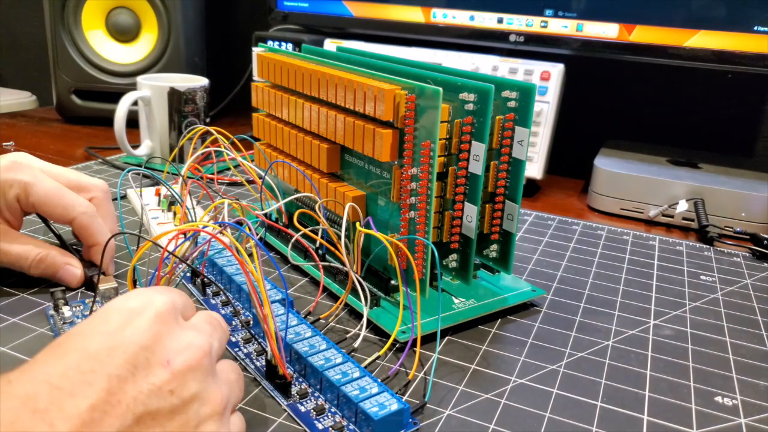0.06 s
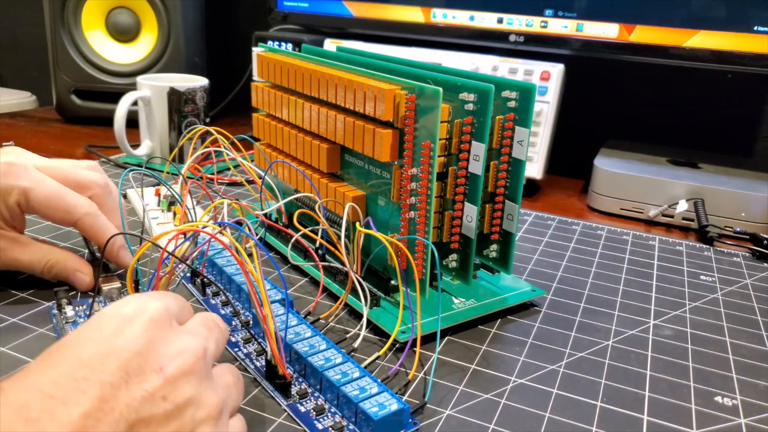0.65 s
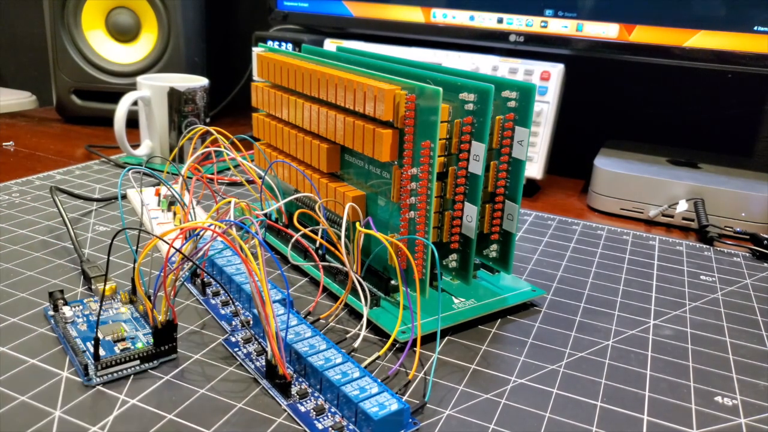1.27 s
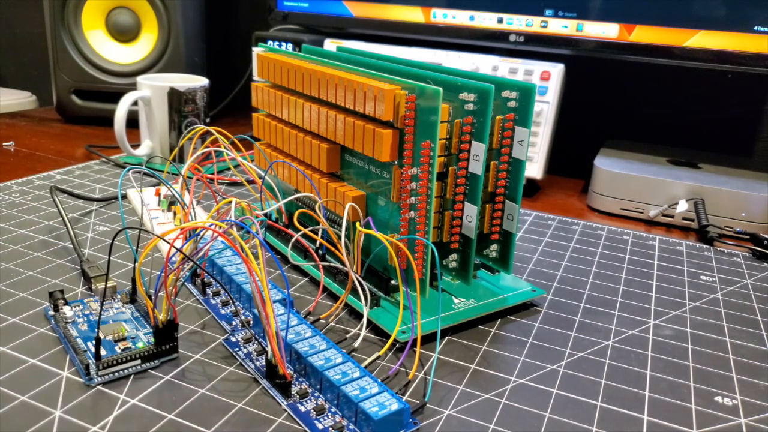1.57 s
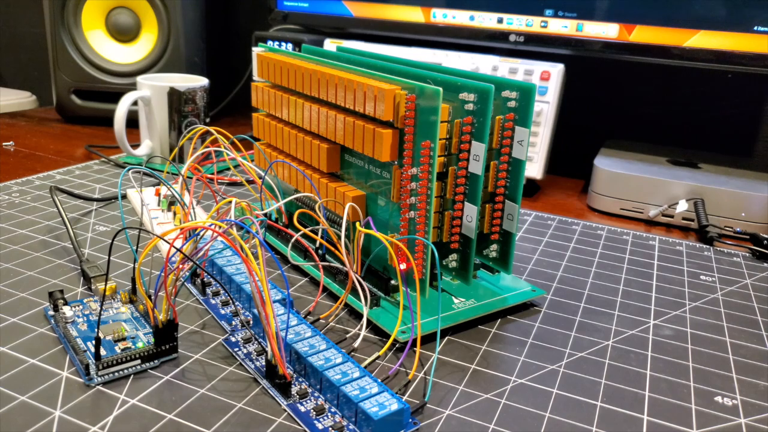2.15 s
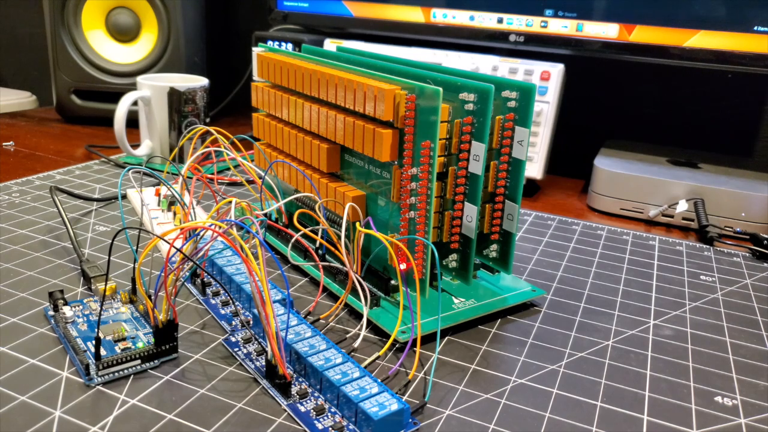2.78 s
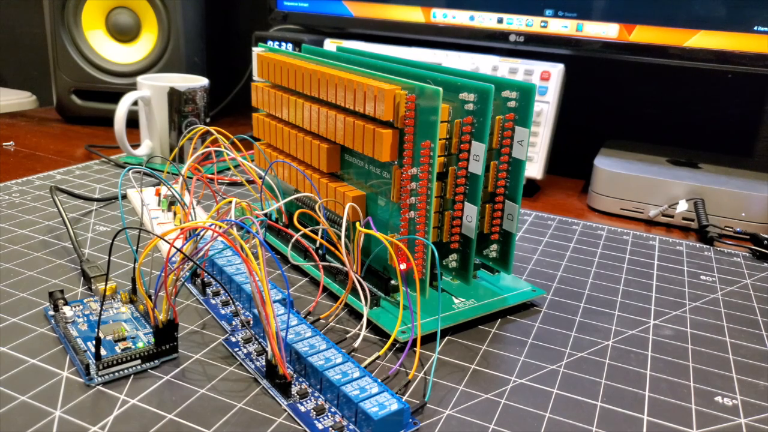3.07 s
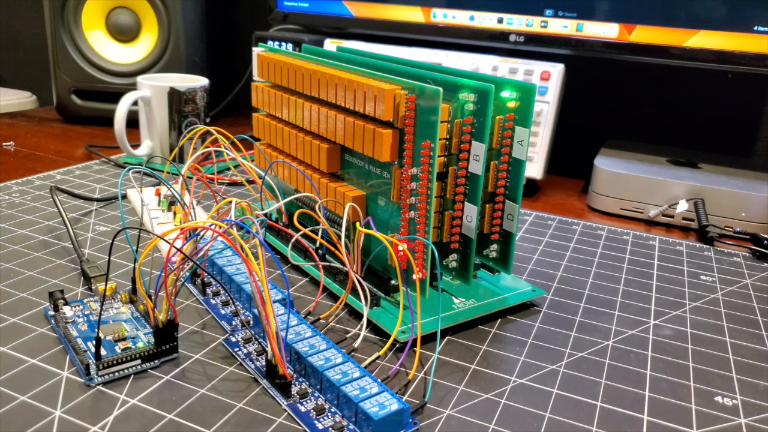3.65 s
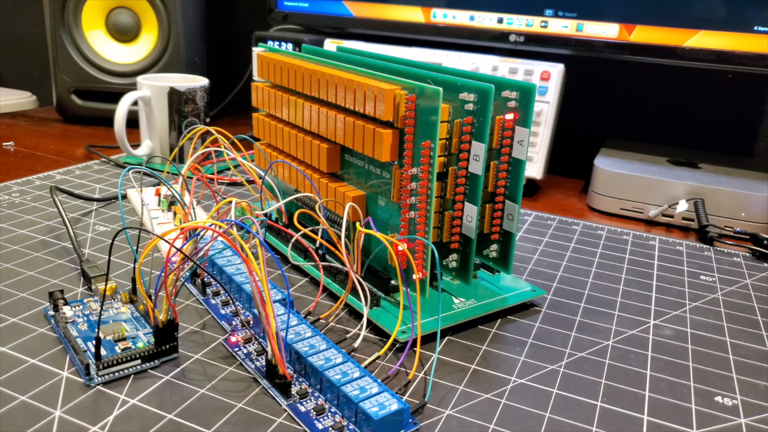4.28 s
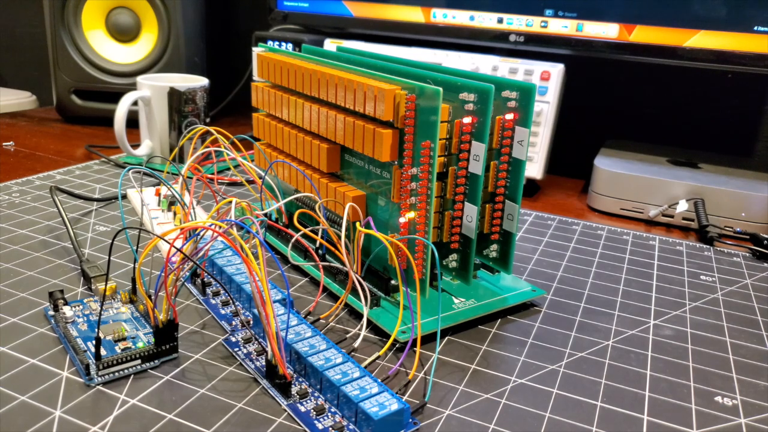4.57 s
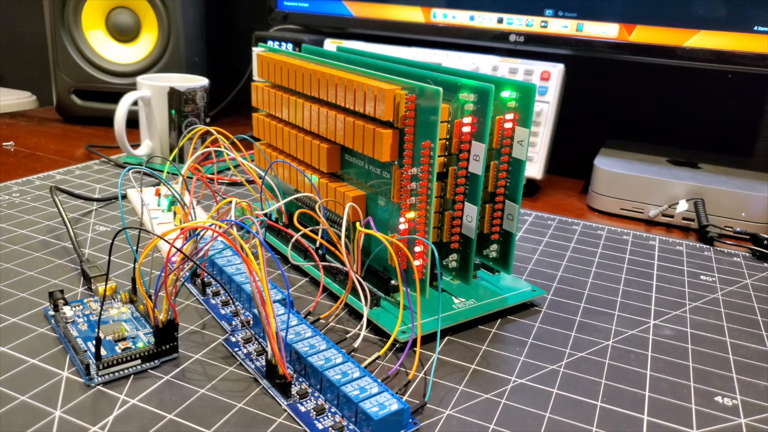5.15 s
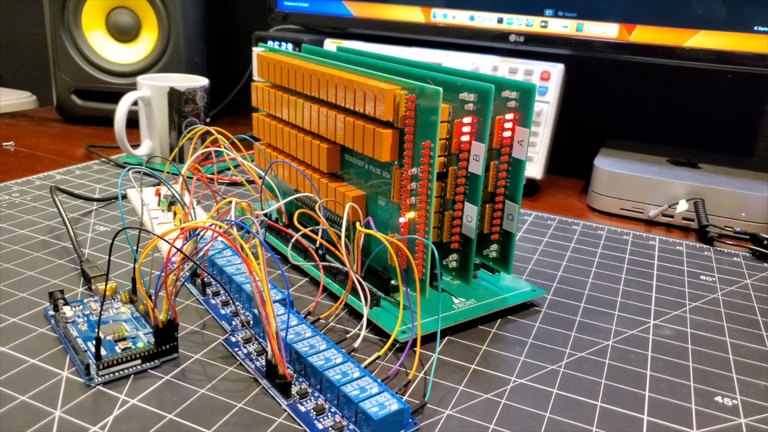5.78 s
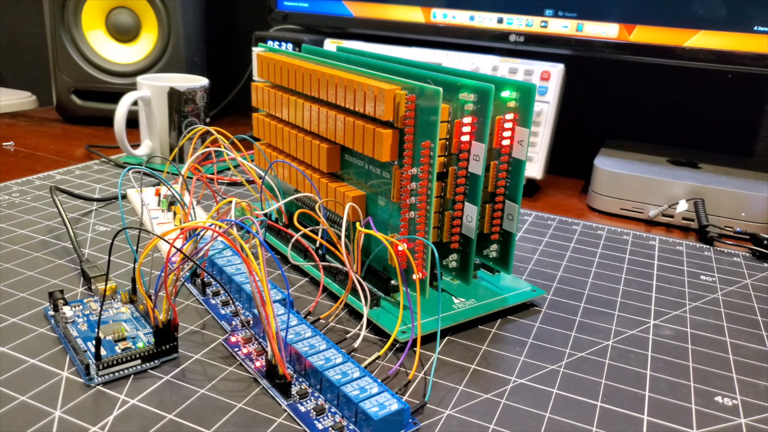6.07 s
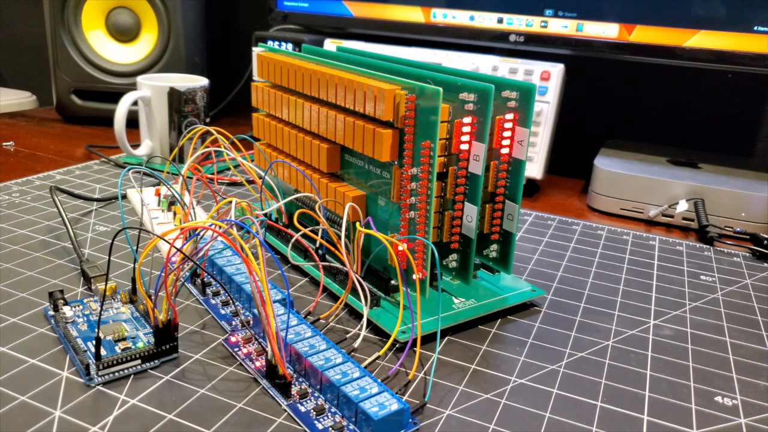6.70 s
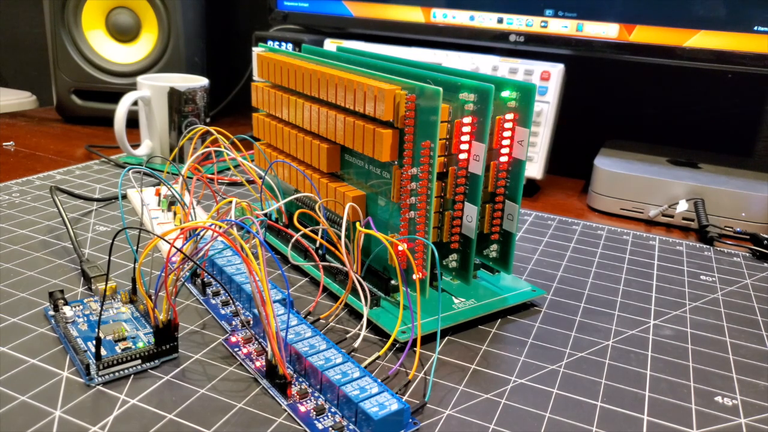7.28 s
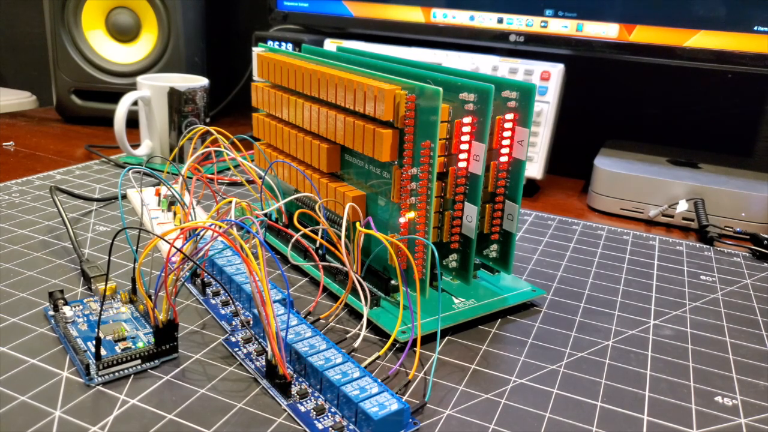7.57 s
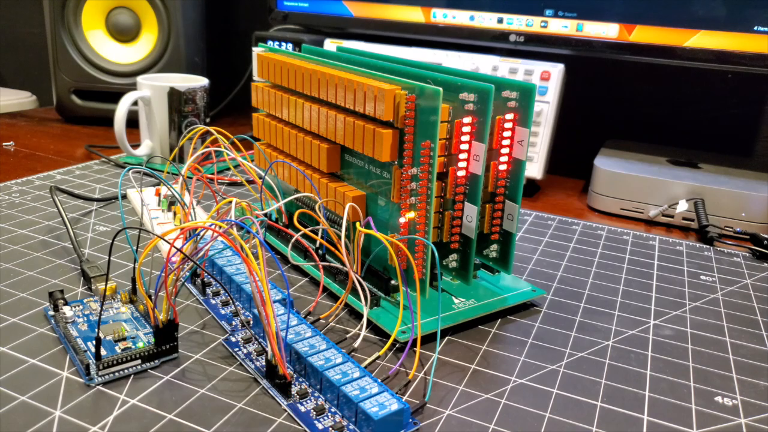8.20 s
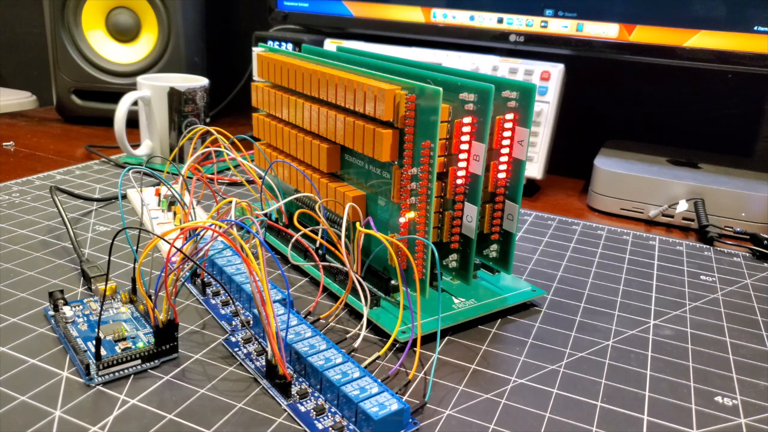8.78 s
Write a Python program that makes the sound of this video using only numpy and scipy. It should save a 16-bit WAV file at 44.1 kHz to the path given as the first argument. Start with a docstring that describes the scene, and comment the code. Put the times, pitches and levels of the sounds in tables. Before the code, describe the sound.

Close by on a desk in a quiet room, a few small knocks end in a firm one as a plug seats. Hands withdraw with barely audible brushing and creaking. After two isolated, bright relay clicks, dozens of relays begin switching in a rapid, regular rhythm, a dense metallic clicking with slight ringing that keeps going to the end. A faint hum wavers underneath.

```python
"""A relay computer starts up

On a desk in a small room, a plug knocks home, hands brush over wires and arms creak as they draw back.
Two single relays (switches moved by magnets) click, then a clock steps cards full of relays through
an eight-beat cycle. From the second cycle on, one louder relay of a driver strip pulls in and drops out
each time round, going from far to near. A faint, low hum wavers underneath."""
import sys
import numpy as np
from scipy import signal
from scipy.fft import rfft, irfft
from scipy.io import wavfile
from scipy.ndimage import uniform_filter1d

SR = 44100
rng = np.random.default_rng(int(sys.argv[2]) if len(sys.argv) > 2 else 0)


def generate_wav(signal):
    """Clip the signal to [-1, 1] and save it as 16-bit WAV at the path in sys.argv[1]."""
    frames = np.transpose(np.atleast_2d(signal))
    scaled = np.clip(frames, -1, 1) * 32767
    pcm = np.round(scaled).astype(np.int16)
    wavfile.write(sys.argv[1], SR, pcm)


N = 398663
SIZE = 4096  # samples in one short hit
HZ = np.fft.rfftfreq(SIZE, 1 / SR)
T = np.arange(SIZE) / SR
START_S, BEAT_S, CYCLE_COUNT = 3.6613, .07523, 9  # the clock
SHAKE_S, REST_S = .0014, .007  # after a beat, the card shakes, then the relays' moving arms land

# The dull tone of a knocked board. Each row: frequency in Hz, relative level in dB.
BOARD_TONE = [(100, -14), (280, -14.5), (390, 3.5), (500, -4), (660, 3.5), (820, -6), (1400, -9),
              (2300, -24), (5000, -8), (16000, -57)]
# Relays letting go on each beat of the cycle. Each row: snap level in dB, card shake in dB,
# card ring in Hz, level of the landing arms in dB.
BEATS = [(-6.5, -15.5, 3680, -10), (-3, -10.5, 4700, -11), (-4.5, -9, 3750, -16), (-2, -9, 360, -14.5),
         (-5.5, -10.5, 4900, -7.5), (-2, -9.5, 3600, -10), (-4.5, -9.5, 3450, -13), (-2, -7.5, 1220, -28.5)]


def amp(db):
    """Turns decibels into a gain."""
    return 10 ** (np.asarray(db) / 20)


def unit(x):
    """Scales a sound to energy 1."""
    return x / np.sqrt(np.sum(x ** 2) + 1e-20)


def read(points, hz):
    """Reads between a table's rows, with frequency spaced by octaves."""
    f, value = np.transpose(points)
    return np.interp(np.log(hz + 1), np.log(f), value)


def level(curve):
    """Turns rows of seconds and dB into a gain over the whole scene."""
    return amp(np.interp(np.arange(N) / SR, *np.transpose(curve)))


def add(mix, s, db, sound):
    """Mixes a sound in at s seconds with a gain of db."""
    part = mix[max(round(s * SR), 0):][:len(sound)]
    part += amp(db) * sound[:len(part)]


def noise(gain_at):
    """Steady noise of average power 1, shaped by a gain for each frequency."""
    hz = np.fft.rfftfreq(N, 1 / SR)
    return np.sqrt(N) * unit(irfft(rfft(rng.standard_normal(N)) * gain_at(hz), N))


def tones(lines):
    """Wavering tones made of narrow bands of noise."""
    return noise(lambda hz: sum(amp(db) / (1 + (2 * (hz - f) / width) ** 2) for f, width, db in lines))


def body(spectrum, rings=(), tilt_db=0):
    """How an object answers one sharp tap. Each ring: pitch in Hz, width in Hz, boost in dB."""
    db = read(spectrum, HZ) + tilt_db * np.log2((HZ + 100) / 1000)
    peaks = 1 + sum((amp(boost) ** 2 - 1) / (1 + (2 * (HZ - hz) / width) ** 2)
                    for hz, width, boost in rings)
    cepstrum = irfft(np.log(amp(db)) + np.log(np.maximum(peaks, 1e-2)) / 2)
    # folding the second half onto the first puts all the ringing after the tap
    cepstrum[1:SIZE // 2] *= 2
    cepstrum[SIZE // 2 + 1:] = 0
    return unit(irfft(np.exp(rfft(cepstrum))))


def chatter(t60, rise):
    """A burst of tiny contacts, even in tone, that builds over rise seconds and falls 60 dB in t60."""
    envelope = amp(-60 * T / t60) * (1 - np.exp(-(T + 1 / SR) / rise))
    spectrum = rfft(rng.standard_normal(SIZE) * envelope, 2 * SIZE)
    even = irfft(spectrum / np.sqrt(uniform_filter1d(abs(spectrum) ** 2, size=33) + 1e-9))
    return unit(even[:SIZE])


def hit(force, response):
    """The sound of a force striking an object, at energy 1."""
    return unit(signal.fftconvolve(force, response))


def ping(hz, spread, t60):
    """A fading ring of ten close pitches, scattered by spread (a share of hz)."""
    t = np.arange(SR // 2) / SR
    pitches = hz * (1 + spread * rng.standard_normal((10, 1)))
    waves = np.sin(2 * np.pi * (pitches * t + rng.random((10, 1))))
    return unit(waves.sum(0) * amp(-60 * t / t60))


def room_air():
    """The air of the room: a soft, low rush."""
    # Its tone. Each row: frequency in Hz, relative level in dB.
    air_tone = [(25, -14), (55, -12.5), (120, -8), (160, -13), (230, -10), (400, -16), (700, -25.5),
                (1500, -37), (3500, -41), (6000, -51.5), (9000, -52), (11000, -48.5), (16000, -41)]
    # Its loudness. Each row: time in seconds, level in dB.
    air_levels = [(0, -58), (1.8, -57.5), (2.4, -60), (3.6, -58.5), (4.2, -61.5), (9.04, -62)]
    return noise(lambda hz: amp(read(air_tone, hz))) * level(air_levels)


def low_hum():
    """A low, wavering hum, turned down once the steady clicking starts."""
    # Its tones. Each row: pitch in Hz, width in Hz, relative level in dB.
    hum_tones = [(82.4, 7.8, 4), (106.6, 23, -6.5)]
    # How far it is turned up or down. Each row: time in seconds, relative level in dB.
    hum_levels = [(0.0, -52.5), (0.5, -53.5), (0.55, -66), (1.13, -49.5), (1.18, -59.5), (1.89, -53),
                  (1.99, -59), (3.37, -51.5), (5.31, -65.5), (6.04, -57.5), (6.29, -65.5), (7.78, -59),
                  (7.85, -66), (9.04, -60.5)]
    return amp(-0.5) * tones(hum_tones) * level(hum_levels)


def whine():
    """The electronics give off a very faint, thin whine."""
    # Its tones. Each row: pitch in Hz, width in Hz, relative level in dB.
    whine_tones = [(7550, 220, 1), (10700, 250, 4.5), (13200, 330, -14), (15500, 450, 7)]
    return amp(-84.5) * tones(whine_tones)


def plug_knocks():
    """Plug and fingers knock on a small board; a thin, high ring lingers after each knock."""
    # The knocks. Each row: start in seconds, level in dB, brightness in dB per octave, ring in Hz.
    knocks = [(0.059, -30.5, 3.5, 1290), (0.0678, -19, -15.5, 650), (0.1427, -12, -8, 750),
              (0.182, -34.5, 5.5, 5950), (0.3655, -27.5, -18, 1290), (0.46, -1.5, -.5, 1230),
              (1.044, -26, -17.5, 390)]
    # The plug's tone. Each row: frequency in Hz, relative level in dB.
    plug_tone = [(30, -66), (150, -32), (380, -16), (520, -19), (680, -7), (1000, -9), (1330, 1),
                 (1900, -10), (2900, -2), (3750, 3), (4600, -13), (6300, -11), (9500, -20), (12200, -14),
                 (16000, -27)]
    # Where it rings. Each row: pitch in Hz, width in Hz, boost in dB.
    plug_rings = [(1490, 160, 8.6), (2180, 210, 9.4), (2530, 78, 7), (4680, 48, 2.8)]
    out = np.zeros(N)
    for s, db, tilt_db, hz in knocks:
        force = chatter(t60=.005, rise=.0004) + .9 * chatter(t60=.035, rise=.0015)
        add(out, s, db, hit(force, body(plug_tone, plug_rings + [(hz, 220, 8)], tilt_db)))
        add(out, s, db - 15 + tilt_db, ping(hz=3530, spread=.009, t60=.4))  # the thin, high ring
    return out


def brushing():
    """Each stroke of a hand over the wires swells and fades, scratching unevenly."""
    # The strokes. Each row: loudest moment in seconds, level in dB, swell and fade in seconds.
    brushes = [(.3, -80.5, .5, 0.48), (1.11, -63.5, 0.084, 0.03), (1.85, -66.5, 0.12, 0.19)]
    # The rustle's tone. Each row: frequency in Hz, relative level in dB.
    rustle_tone = [(200, -7.5), (500, 8), (1500, -9), (3200, -2.5), (6000, -9.5), (15000, -16)]
    t = np.arange(N) / SR
    strokes = sum(amp(db) * np.exp(-((t - s) / np.where(t < s, swell, fade)) ** 2)
                  for s, db, swell, fade in brushes)
    grain_times = np.arange(0, N / SR, .003)
    scratch_db = np.interp(t, grain_times, 2.5 * rng.standard_normal(len(grain_times)))
    return noise(lambda hz: amp(read(rustle_tone, hz))) * strokes * amp(scratch_db)


def creaks():
    """Two soft creaks of sticking and slipping: a harder push makes louder, quicker slips."""
    # One curve of push for each creak. Each row: time in seconds, relative level in dB.
    pushes = [
        [(0.6, -67), (0.612, -58), (0.752, -53.5), (0.78, -62), (0.892, -43), (0.96, -60)],
        [(1.3, -65), (1.318, -56.5), (1.402, -54.5), (1.412, -54), (1.63, -52), (1.67, -68)],
    ]
    # The low tone of a slip. Each row: frequency in Hz, relative level in dB.
    slip_tone = [(60, -47), (150, -7.5), (240, 2), (300, 3), (400, -27), (550, -32), (900, -62),
                 (4000, -57)]
    slowest_per_s, doubling_db, reference_db = 24, 10, -53.5
    out, slip = np.zeros(N), body(slip_tone)
    for curve in pushes:
        times, levels = np.transpose(curve)
        s = times[1]
        for uneven in rng.standard_normal(size=40):
            if s > times[-1]:
                break
            push_db = np.interp(s, times, levels) - reference_db
            add(out, s, -23.5 + 0.84 * push_db, slip)
            slips_per_s = slowest_per_s * 2 ** (max(push_db, 0) / doubling_db)
            s += np.exp(0.1235 * uneven) / slips_per_s
    return out


def single_relays():
    """Lone relays: a crisp strike, a short rattle, springs that ring on, and a knock in the card."""
    # The clicks. Each row: start in seconds, level in dB, main and lower ring in Hz, knock in dB.
    clicks = [(2.0861, -6.5, 6950, 3315, -27.5), (2.585, -6, 6620, 4800, -19)]
    # The relay's tone. Each row: frequency in Hz, relative level in dB.
    relay_tone = [(300, -9), (1200, -40), (2000, -20.5), (3300, -6.5), (5600, -11), (8200, 2), (10000, 1.5),
                  (12000, -3.5), (16000, -1)]
    out = np.zeros(N)
    for s, db, main_hz, lower_hz, knock_db in clicks:
        force = chatter(t60=.006, rise=.0015) + .7 * chatter(t60=.06, rise=.003)
        frame = body(relay_tone, [(main_hz, 400, 6), (lower_hz, 300, 9), (4550, 300, 6)])
        add(out, s, db, hit(force, frame))
        springs = [(main_hz, -14, .24), (lower_hz, -20, .28), (8360, -20, .2), (10350, -22, .2)]
        for hz, ring_db, t60 in springs:
            add(out, s, db + ring_db, ping(hz, spread=.023, t60=t60))
        card = body(BOARD_TONE, [(1210, 93, 12), (2220, 87, 24)])
        add(out, s, knock_db, hit(chatter(t60=0.1, rise=0.0023), card))
    return out


def beat_times(beat):
    """The times in seconds at which one beat of the cycle comes round."""
    return START_S + BEAT_S * (beat + len(BEATS) * np.arange(CYCLE_COUNT))


def again(habit, fresh, change):
    """A relay repeats its usual stroke with a share of fresh randomness mixed in."""
    return np.sqrt(1 - change) * habit + np.sqrt(change) * fresh


def card_relays():
    """On each beat some relays snap open and others close a moment later. Both shake their cards."""
    # Tones of an opening snap, a closing strike and a shaken card.
    # Each row: frequency in Hz, relative level in dB.
    snap_tone = [(300, -28.5), (1500, -6.5), (2400, -22), (3300, -31), (5500, -12.5), (7500, -6.5),
                 (9000, -3.5), (12000, -4), (14000, -2.5), (16000, 8.5)]
    strike_tone = [(300, -15.5), (2300, -19.5), (3400, -11), (6500, -12.5), (9000, -3), (13000, -9.5),
                   (15000, -1), (16000, 5)]
    card_tone = [(100, -18.5), (280, -18), (370, -4.5), (490, -10.5), (630, -10), (850, -7), (1250, -7),
                 (1500, -3), (1950, -1.5), (2350, -5), (2900, 0.5), (4600, -2.5), (7200, -5), (9500, 1.5),
                 (16000, 4)]
    # Where the snap and the card ring. Each row: pitch in Hz, width in Hz, boost in dB.
    snap_rings = [(6515, 130, 15.5), (8270, 200, 17.3), (9350, 200, 6.1), (9380, 117, 17.2),
                  (10460, 150, 13.2), (12100, 310, 9.7), (14000, 280, 18)]
    card_rings = [(387.5, 147, 4.45), (588, 21, 9.8), (646, 7.8, 2.1), (700, 12, 6.9), (1176, 118, 8.7),
                  (1785, 70, 4.2), (3210, 43, 5.1), (3440, 72, 1.1), (3130, 100, 0.82), (4870, 560, 5.4),
                  (6020, 170, 5.6)]
    # Relays closing. Each row: beat from 0 to 7, delay in seconds, strike level in dB,
    # strike ring in Hz, card shake in dB, card ring in Hz.
    closings = [(0, .0104, -6.5, 10100, -9.5, 3300), (1, .0123, -8, 14200, -9.5, 1780),
                (1, .0188, -12, 15100, -19.5, 4370), (2, 0.009, -17, 11800, -8, 3100),
                (2, .0172, -7, 10800, -9, 1860), (3, 0.006, -19, 9400, -16.5, 2650),
                (4, 0.0079, -11.5, 14700, -20, 3300), (4, 0.016, -21, 14900, -4, 3506),
                (5, .0162, -7.5, 14800, -13, 1890), (6, 0.012, -8, 15150, -7, 4870),
                (6, 0.017, -17, 15000, -11.5, 1800), (7, 0.0073, -20, 13580, -35.5, 3180)]
    snap_force = lambda: chatter(t60=.005, rise=.0006) + .8 * chatter(t60=.016, rise=.0012)
    strike_force = lambda: chatter(t60=.006, rise=.0015)
    card_force = lambda: chatter(t60=0.068, rise=0.00093)
    out, snap, shakes = np.zeros(N), body(snap_tone, snap_rings), []
    for beat, (db, shake_db, card_hz, rest_db) in enumerate(BEATS):
        habit = snap_force()
        for s in beat_times(beat):
            scatter_db = 0.1 * rng.standard_normal()
            add(out, s, db + scatter_db, hit(again(habit, snap_force(), change=0.39), snap))
        shakes += [(beat, SHAKE_S, shake_db, card_hz), (beat, REST_S, rest_db, 3170)]
    for beat, delay, db, hz, shake_db, card_hz in closings:
        habit, frame = strike_force(), body(strike_tone, [(hz, 700, 7)])
        for s in beat_times(beat):
            late, harder = rng.standard_normal(2)
            force = again(habit, strike_force(), change=0.29)
            add(out, s + delay + .0003 * late, db + 0.47 * harder, hit(force, frame))
        shakes.append((beat, delay, shake_db, card_hz))
    for beat, delay, db, hz in shakes:
        tilt_db = 0.74 * (-1) ** beat  # even beats are brighter, odd beats duller
        habit, card = card_force(), body(card_tone, card_rings + [(hz, 300, 7)], tilt_db)
        for cycle, s in enumerate(beat_times(beat)):
            easing_db = -0.21 * (cycle - CYCLE_COUNT // 2)
            add(out, s + delay, db + easing_db, hit(again(habit, card_force(), change=0.4), card))
    return out


def card_ring():
    """Every beat sets the cards ringing, a little differently; once a cycle the springs join in."""
    # The cards' own notes. Each row: pitch in Hz, level in dB, seconds to fall 60 dB,
    # extra dB on odd beats, growth in dB per cycle.
    card_notes = [(360.2, -32, .22, 1, 0.95), (392.3, -28, 0.26, 1.5, 0.7), (597.3, -33, 0.16, 10, -0.13),
                  (638.3, -33.5, 0.26, 7.5, 0), (1848, -28.5, .12, 3, 0), (3112, -31.5, 0.23, -4, -0.5),
                  (3313, -24.5, 0.3, -8, -0.93)]
    out, t = np.zeros(N), np.arange(SR // 4) / SR
    hz, db, t60, odd_db, growth_db = np.transpose(card_notes)
    notes = np.array([unit(amp(-60 * t / decay)) * np.exp(2j * np.pi * f * t)
                      for f, decay in zip(hz, t60)])
    notes *= np.sqrt(2) * np.minimum(t / REST_S, 1)
    for beat in range(len(BEATS)):
        for cycle, s in enumerate(beat_times(beat)):
            size, turn = rng.random((2, len(hz)))
            gain = (.5 + size) * amp(db + odd_db * (beat % 2) + growth_db * (cycle - CYCLE_COUNT // 2))
            phase = np.exp(2j * np.pi * turn)  # each note starts at a random point of its wave
            add(out, s, 0, ((gain * phase)[:, None] * notes).sum(0).real)
    for s in beat_times(beat=4):  # springs of the biggest group of relays
        add(out, s + 0.02, -16, ping(hz=3490, spread=0.055, t60=0.21))
    return out


def driver_click(frame_hz, spring_hz, frame_db, spring_db, bounce_db):
    """A driver relay's moving arm strikes and bounces once; its frame and spring ring."""
    # The relay's tone. Each row: frequency in Hz, relative level in dB.
    driver_tone = [(200, -11), (500, -24), (1000, -31), (2200, -28), (3400, -8.5), (5600, -7), (7000, -1),
                   (9000, 0), (12000, 2.5), (16000, -20)]
    force = chatter(t60=.009, rise=.0018) + .45 * chatter(t60=.035, rise=.002)
    add(force, .0025, bounce_db, chatter(t60=0.01, rise=0.00054))
    click = hit(force, body(driver_tone, [(frame_hz, 450, frame_db), (spring_hz, 600, spring_db)]))
    sound = amp(-10.5) * ping(hz=6950, spread=0.026, t60=0.1)
    sound[:len(click)] += click
    return sound


def driver_strip():
    """Each relay pulls in, nudging the strip, then drops out, thumping it against the desk."""
    # The relays, far to near. Each row: level in dB, frame and spring ring in Hz when pulling in,
    # frame and spring ring in Hz when dropping out.
    drivers = [(-8.5, 7500, 11000, 6600, 15500), (-4.5, 7100, 12100, 7080, 14300),
               (-2.5, 8000, 13000, 7430, 15000), (-2.5, 7600, 11600, 8500, 9820),
               (-2, 7600, 12360, 8207, 12320), (-3.5, 7650, 11620, 6480, 16000),
               (-3, 8020, 13700, 8200, 15200), (-1.5, 7950, 11500, 7800, 14700)]
    out = np.zeros(N)
    nudged, thumped = body(BOARD_TONE, [(416, 290, 17)]), body(BOARD_TONE)
    pulls, drops = beat_times(beat=0)[1:], beat_times(beat=3)[1:]
    for k, (db, frame_hz, spring_hz, drop_frame_hz, drop_spring_hz) in enumerate(drivers):
        pull = driver_click(frame_hz, spring_hz, frame_db=11, spring_db=8.5, bounce_db=-33)
        add(out, pulls[k], db, pull)
        add(out, pulls[k], db - 23, hit(chatter(t60=0.019, rise=.002), nudged))
        drop = driver_click(drop_frame_hz, drop_spring_hz, frame_db=3, spring_db=9, bounce_db=0)
        add(out, drops[k], db - 2.3, drop)
        thump_db = -20 + 1.03 * k  # grows along the strip
        add(out, drops[k], thump_db, hit(chatter(t60=0.031, rise=0.001), thumped))
    return out


def room(x, wet_db):
    """Adds dense echoes from desk, screens and walls; each band of pitch dies at its own speed."""
    # How long the echoes last. Each row: frequency in Hz, seconds to fall 60 dB.
    echo_times = [(200, 0.38), (800, 0.2), (1600, 0.35), (2600, 0.32), (3400, 0.3), (4200, 0.34),
                  (7000, 0.34), (10000, 0.25), (16000, 0.27)]
    # Their tone. Each row: frequency in Hz, relative level in dB.
    echo_tone = [(200, -3), (600, 5), (1500, -7), (2600, -3.5), (3350, -1.5), (4200, -4), (7200, -5.5),
                 (10000, -7), (16000, -10.5)]
    hz, t, bands = signal.stft(rng.standard_normal(SR // 2), SR, nperseg=256)
    t60 = read(echo_times, hz)[:, None]
    bands *= amp(read(echo_tone, hz)[:, None] - 60 * t / t60) * np.sqrt(2 * np.log(1000) / (t60 * SR))
    spectrum = rfft(signal.istft(bands, SR, nperseg=256)[1], SR)
    # the echoes' narrow peaks are evened out, so they add no sharp tones of their own
    power = abs(spectrum) ** 2
    evening_out = np.sqrt(uniform_filter1d(power, size=601) / uniform_filter1d(power, size=41))
    tail = irfft(spectrum * evening_out)[:SR // 2]
    tail *= 1 - np.exp(-(np.arange(len(tail)) / SR / .0025) ** 2)  # echoes take a moment to build
    return x + amp(wet_db) * signal.fftconvolve(x, tail)[:N]


def scene():
    """Mixes relays, hands and the quiet background into one channel."""
    relays = room(card_relays(), wet_db=-1.5) + card_ring()
    relays += room(driver_strip(), wet_db=-3) + room(single_relays(), wet_db=-5)
    handling = room(plug_knocks() + creaks(), wet_db=-2.5)
    background = room_air() + low_hum() + whine()
    return (relays + handling + background + brushing())[None]


def record(dry):
    """Cuts away the highest treble, above 15900 Hz."""
    low_pass = signal.firwin(255, 15900, window=("kaiser", 8), fs=SR)
    return signal.oaconvolve(dry, low_pass[None], "same")


dry = scene()
out = record(dry)
generate_wav(out)
```